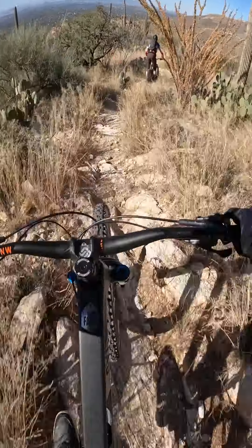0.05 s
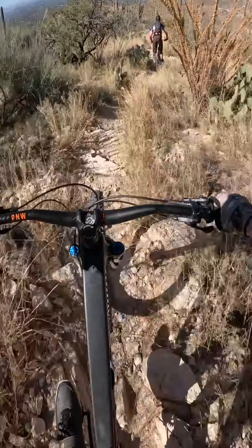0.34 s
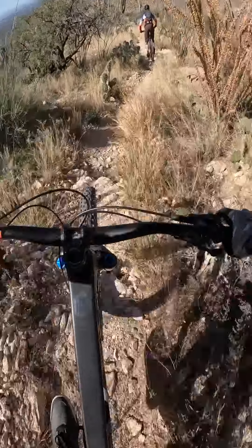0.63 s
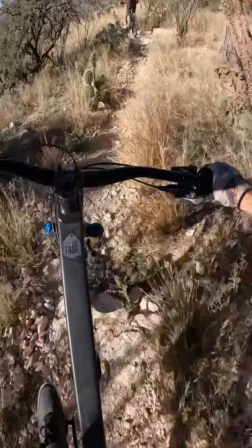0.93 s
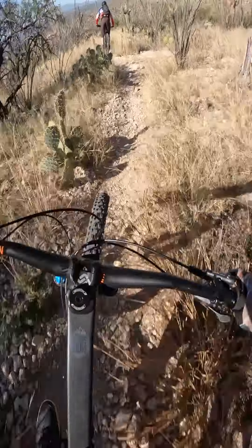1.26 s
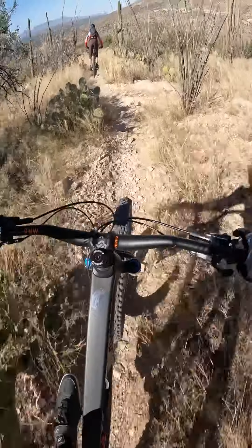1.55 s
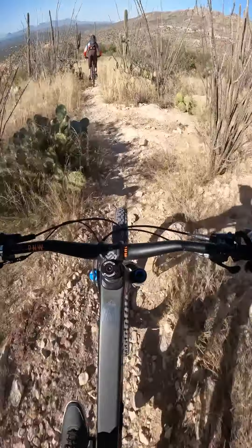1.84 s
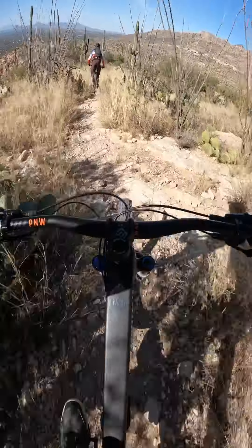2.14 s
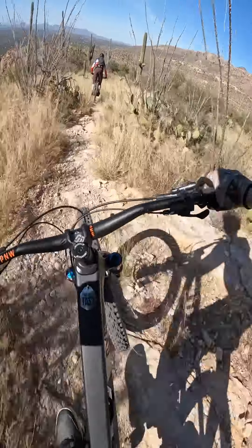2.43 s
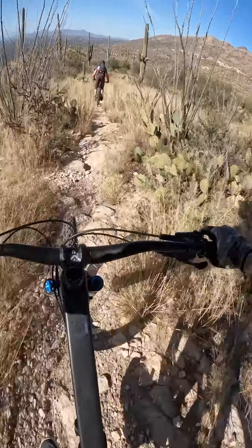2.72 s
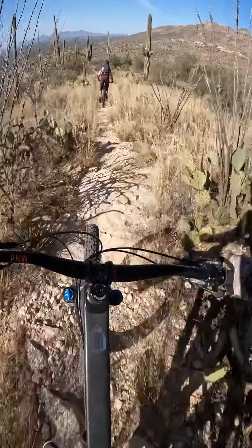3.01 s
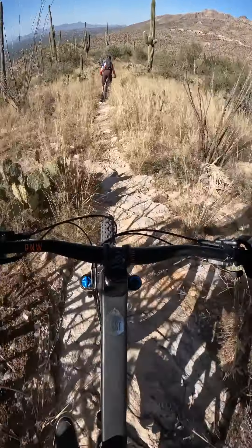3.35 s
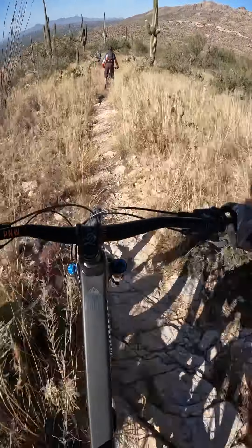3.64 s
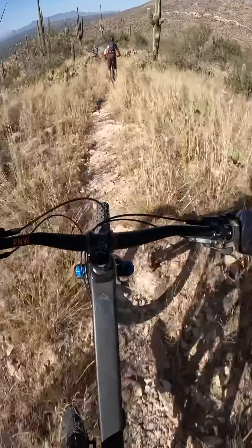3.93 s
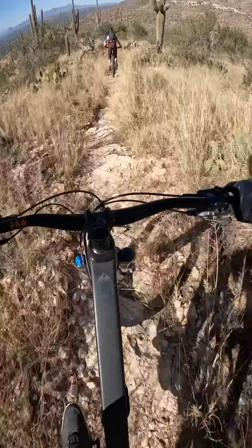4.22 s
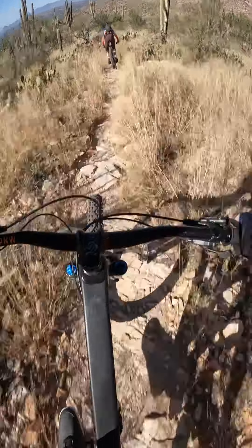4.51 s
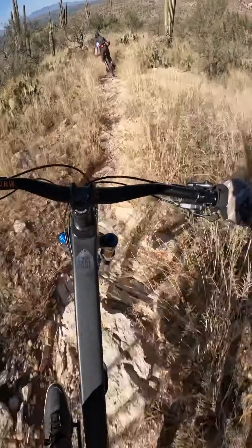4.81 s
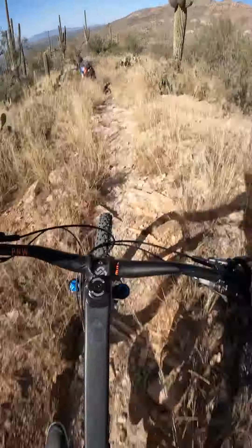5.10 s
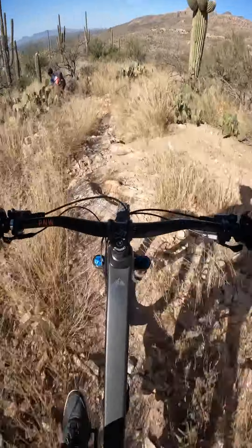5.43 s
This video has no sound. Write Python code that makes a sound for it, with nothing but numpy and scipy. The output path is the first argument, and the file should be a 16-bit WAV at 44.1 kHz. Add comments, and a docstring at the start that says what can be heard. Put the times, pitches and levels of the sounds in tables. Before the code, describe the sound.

A mountain bike coasts down a rocky dirt trail, heard close from the rider's chest. The tyres drum and crunch over gravel while rocks thump the wheels, the frame clacks and cables rattle. Early on it lands off a ledge with a deep thud, and a stone pings off metal. More rough patches follow, with light chain jingle and a whirring hub. Wind buffets the microphone, and there is no echo.

```python
"""A drumming, crunching, clattering ride: a mountain bike coasts down a rocky desert trail.
Tread knobs and stones drum on the hollow tyres, gravel crunches and rocks thump the wheels.
The frame clacks, cables rattle, the chain jingles, the rear hub whirrs and dry grass brushes past.
Wind buffets the microphone on the rider's chest. The open ground gives no echo."""
import sys
import numpy as np
from scipy import signal
from scipy.fft import rfft, irfft
from scipy.io import wavfile
from scipy.ndimage import uniform_filter1d, map_coordinates

SR = 44100
rng = np.random.default_rng(int(sys.argv[2]) if len(sys.argv) > 2 else 0)


def to_wav(sig):
    """Store sig (one row per channel, or 1-D mono) as 16-bit WAV at the path in sys.argv[1].

    Samples outside -1..1 are clipped; the rate is SR.
    """
    pcm = np.clip(np.atleast_2d(sig), -1, 1) * 32767
    pcm = np.round(pcm).astype(np.int16)
    wavfile.write(sys.argv[1], SR, pcm.T)  # frames by channels


N = 249606
TIME = np.arange(N) / SR
HIT_TIME = TIME[:SR // 4]  # the clock for a single hit, in seconds

# A mode is a tone that a struck thing rings with. A fade time (t60) is how long it takes to drop 60 dB.
# modes of the tyre casing and the air inside: (pitch [Hz], level [dB], fade time [s])
TYRE_MODES = [(238, -1.5, 0.22), (276.8, 8, 0.12), (362, -7.5, 0.054), (422, -10.5, 0.13), (552, -5, 0.058),
              (697, -20, 0.046)]
# modes of the frame and handlebar: (pitch [Hz], level [dB], fade time [s])
FRAME_MODES = [(620, -3, 0.049), (1073, -4.5, 0.17), (1310, -3, 0.018), (1558, 6, 0.03),
               (1697, -1.5, 0.053), (2190, -4, 0.027)]
# rocks under the wheels: (time [s], level [dB], pitch [Hz], tyre ring [dB], length [cycles])
ROCK_HITS = [(.036, -15.5, 262, -10, 1.9), (.151, -9.5, 288, -12, 1.1), (.547, -17, 280, -12, 3),
             (0.764, -15.5, 274, -11, 2.4), (.822, -12.5, 276, -6, 3.5), (.930, -12, 378, -21, 0.83),
             (1.024, -19.5, 270, 5, 2.9), (1.128, -22, 290, -6, 2.4), (1.206, -4.5, 233, -13, 0.58),
             (1.28, -16, 214, -15, 2.1), (1.343, -21.5, 280, 11.5, 2.5), (1.348, -15, 432, -4, 3.3),
             (2.014, -9.5, 288, -21, 0.9), (2.127, -9.5, 320, -18, 1.6), (2.295, -13, 342, -18, 1.4),
             (2.328, -8, 480, -13, 1.6), (2.436, -11, 422, -7, 2.8), (2.517, -4, 322, -17, 1.04),
             (2.552, -14.5, 328, -18, 1.1), (2.583, -21.5, 400, 8, 1.5), (2.615, -8, 273, -11, 1.8),
             (2.636, -11, 300, -12, 0.7), (2.651, -21, 443, -21, 0.84), (2.664, -8.5, 408, -27, 0.77),
             (3.335, -21, 258, -2, 0.78), (3.483, -17, 268, -16, 2.1), (3.535, -13, 540, -9, 1.4),
             (3.584, -17, 304, 3, 0.52), (3.659, -23, 450, 3, 1.8), (3.695, -15.5, 269, -13, 1.3),
             (3.813, -14, 430, -10, 0.67), (3.827, -11, 230, -7, 2.1), (4.014, -17, 242, -16, 3.3),
             (4.279, -14.5, 447, -16, 2.6), (4.319, -13.5, 272, -10, 2.6), (4.407, -16, 246, -2, 1.9),
             (4.468, -12.5, 236, -17, 2.4), (4.54, -17.5, 586, 3, 2.6), (4.601, -12.5, 395, -10, 2.4),
             (4.652, -15, 235, -11, 2.1), (4.724, -12.5, 275, -14, 1.3), (4.781, -16.5, 570, -10, 2.8),
             (4.814, -16, 280, -12, 1.5), (4.876, -15, 312, -12, 2), (5.06, -10.5, 258, -14, 1.26),
             (5.212, -11.5, 284, -10, 1.6), (5.300, -14, 243, -14, 1.4), (5.35, -17, 222, -10, 1.3),
             (5.378, -13, 458, -18, 2.3), (5.431, -16.5, 565, -17, 3.1)]
# chain and stones hitting the frame: (time [s], level [dB], pitch [Hz], chatter [dB])
FRAME_HITS = [(.037, -19, 1350, 1.5), (.061, -24, 1970, -6), (.152, -24, 1000, 1.5), (.167, -23, 1200, -3),
              (.245, -15.5, 1080, -18), (.827, -25, 1060, -9), (.931, -19, 1480, -11),
              (1.238, -30, 1560, 0), (1.252, -23, 1650, 5), (1.282, -22.5, 1600, 1), (1.347, -14, 850, -3),
              (1.384, -24, 1200, -4), (1.397, -26, 1070, 9.5), (1.587, -26, 1250, -1),
              (1.948, -20.5, 1180, -15), (2.329, -32, 780, -16), (2.346, -19, 1180, -6),
              (2.405, -22, 1360, -1), (2.438, -18, 1420, -13), (2.594, -14.5, 1520, -10),
              (2.638, -11.5, 1370, -18), (2.651, -19, 1700, -15), (2.664, -15.5, 1130, -11),
              (2.676, -28, 1000, -17), (3.114, -18, 1000, -10), (3.305, -22, 1050, -6),
              (3.413, -14.5, 1040, -21), (3.485, -22.5, 1180, -12), (3.548, -26, 950, -5),
              (3.583, -23, 900, -1), (3.813, -21.5, 870, -4), (3.821, -25, 1290, 0),
              (4.232, -13.5, 1260, -8), (4.258, -17.5, 1400, -5), (4.263, -21, 1380, -13),
              (4.278, -17, 1450, -3), (4.540, -23.5, 1370, 1), (4.571, -23, 1400, 2),
              (4.627, -20, 1450, -3), (4.668, -21, 1160, -6), (4.728, -21.5, 820, -5),
              (5.012, -21.5, 1170, 4), (5.111, -19.5, 1580, -12), (5.204, -29, 1050, 6),
              (5.254, -25, 1460, 5), (5.294, -19, 1340, 2), (5.432, -24, 1190, 4), (5.459, -14.5, 880, -17),
              (5.594, -19, 1300, 0)]


def undb(db):
    """Turn decibels into a gain to multiply by."""
    return 10 ** (np.asarray(db) / 20)


def unit(x):
    """Scale to an average (rms) level of 1."""
    return x / np.sqrt(np.mean(x ** 2))


def peak_one(x):
    """Scale to a peak of 1."""
    return x / np.abs(x).max()


def even(x, span_s):
    """Hold the average level near 1, ironing out swells slower than span_s."""
    return x / np.sqrt(uniform_filter1d(x ** 2, max(int(span_s * SR), 2)) + 1e-9)


def add(track, s, sound):
    """Mix a sound in at s seconds."""
    start = int(np.clip(s * SR, 0, N - 1))
    track[start:start + len(sound)] += sound[:N - start]


def gains(table):
    """Turn rows of (time [s], level [dB], ...) into one gain curve per level column."""
    times, *columns = np.transpose(table)
    return [undb(np.interp(TIME, times, db)) for db in columns]


def bursts(rows, attack_s, release_s):
    """A gain curve that rises, holds and dies away for each (time [s], length [s], level [dB])."""
    power, age = np.zeros(N), TIME[:SR // 2]
    for s, length, db in rows:
        shape = np.minimum(age / attack_s, 1) * np.exp(-np.maximum(age - length, 0) / release_s)
        add(power, s, (undb(db) * shape) ** 2)
    return np.sqrt(power)


def colour(x, points):
    """Shape the lows and highs of a sound to an outline of (frequency [Hz], level [dB])."""
    hz, db = np.transpose(points)
    bins = np.linspace(1, SR / 2, 8193)
    outline = undb(np.interp(np.log(bins), np.log(hz), db))
    cepstrum = irfft(np.log(outline))
    # folding this in half makes the filter ring only after a tap, never before
    half = len(cepstrum) // 2
    cepstrum[1:half] *= 2
    cepstrum[half + 1:] = 0
    response = irfft(np.exp(rfft(cepstrum)))
    return unit(signal.fftconvolve(x, response)[:len(x)])


def band(x, lo_hz, hi_hz, order=2):
    """Keep the part of a sound between two frequencies."""
    sos = signal.butter(order, [lo_hz, min(hi_hz, SR / 2 - 1)], "band", fs=SR, output="sos")
    return signal.sosfilt(sos, x)


def fade(t60):
    """Die away by 60 dB in t60 seconds."""
    return np.exp(-np.log(1000) * HIT_TIME / t60)


def rise(rise_s):
    """Climb softly from 0 towards 1."""
    return 1 - np.exp(-HIT_TIME / rise_s)


def ring(modes):
    """The sound of a thing tapped once: a sum of fading tones."""
    return sum(undb(db) * fade(t60) * np.sin(2 * np.pi * hz * HIT_TIME) for hz, db, t60 in modes)


def resonate(taps, modes):
    """The sound of a thing ringing under a stream of taps."""
    return signal.fftconvolve(taps, ring(modes))[:N]


def swing(hz, cycles):
    """A deadened blow: a few swings that swell and stop."""
    age = HIT_TIME * hz / cycles
    return peak_one(age * np.exp(-age ** 2) * np.sin(2 * np.pi * hz * HIT_TIME))


def walk(rate):
    """A smooth random curve of typical size 1 that turns about rate times a second."""
    step = max(int(SR / rate), 1)
    stairs = np.repeat(rng.standard_normal(N // step + 1), step)
    return unit(uniform_filter1d(stairs, step)[:N])


def waver(x, depth, rate):
    """Let the pitch wander by about the fraction depth."""
    return map_coordinates(x, [np.cumsum(1 + depth * walk(rate))], mode="mirror")


def contacts(per_s, spread_db):
    """Tiny taps at random times; spread_db sets how much their strengths differ."""
    happens = rng.random(N) < per_s / SR
    sizes = np.minimum(rng.exponential(size=N), 4)
    return happens * rng.choice([-1, 1], N) * undb(spread_db * sizes)


def thin_hiss():
    """A faint, high, flickering hiss comes and goes."""
    # strength of the hiss: (time [s], level [dB])
    levels = [(0, -52), (.15, -54), (.22, -60), (.95, -58), (1.15, -52), (1.45, -59.5), (2.3, -53),
              (2.8, -57), (3.55, -52.5), (3.82, -50.5), (4.07, -53), (4.13, -71), (5.2, -61), (5.66, -76)]
    # its tone: (frequency [Hz], level [dB])
    tone = [(6000, -7), (9000, -4), (11400, -8), (12300, -1), (13300, -11), (15500, -20)]
    loudness, = gains(levels)
    flickering = rng.standard_normal(N) * undb(2 * walk(rate=96))
    return loudness * colour(flickering, tone)


def wind(level_db=-1):
    """Swirls of air buffet the microphone with a low rumble."""
    # strength of the gusts: (time [s], level [dB])
    gusts = [(0, -27.5), (.5, -31), (1.1, -26.5), (1.33, -21.5), (1.45, -26), (1.85, -28.5), (2.0, -23.5),
             (2.18, -20), (2.35, -30.5), (2.85, -37), (3.0, -27), (3.7, -21), (3.98, -29.5), (4.08, -14),
             (4.25, -23), (4.6, -19), (4.76, -23), (4.95, -21.5), (5.35, -15.5), (5.66, -20.5)]
    # tone of the rumble: (frequency [Hz], level [dB])
    tone = [(10, -14), (25, 4.5), (42, 0), (60, -3.5), (90, -8), (130, -14), (200, -15.5), (400, -24),
            (1500, -99)]
    gust, = gains(gusts)
    return undb(level_db) * gust * even(colour(rng.standard_normal(N), tone), span_s=0.116)


def grass():
    """Dry stalks flick past in crackling flurries."""
    # grass touching the bike: (time [s], length [s], level [dB])
    brushes = [(1.14, .03, -56), (2.29, .04, -50), (3.08, .07, -51), (3.355, .028, -46.5),
               (3.615, 0.045, -50), (3.73, .16, -47), (4.58, .04, -61)]
    # tone of the stalks: (frequency [Hz], level [dB])
    tone = [(3000, -29), (5500, 5), (7800, 4), (10000, -8), (12400, -2), (15500, -13)]
    flicks = contacts(per_s=6800, spread_db=2) * undb(3 * walk(rate=100))
    return bursts(brushes, attack_s=0.0088, release_s=0.012) * even(colour(flicks, tone), span_s=0.06)


def chain(grit, level_db=-2, shiver_db=-12.5):
    """The slack chain shivers along with the grit and jingles at each jolt."""
    # jolts that fling the chain about: (time [s], length [s], level [dB])
    jolts = [(.13, 0.031, -43), (.56, 0.028, -46), (.78, 0.029, -47.5), (.86, 0.066, -46), (1.14, .03, -46),
             (1.23, 0.13, -48), (1.52, 0.093, -48), (3.36, 0.034, -46), (3.72, 0.17, -54),
             (4.195, 0.031, -47), (4.37, .03, -47), (4.52, .012, -42), (4.705, 0.024, -47),
             (4.93, .015, -46)]
    # modes of the links: (pitch [Hz], level [dB], fade time [s])
    link_modes = [(7010, 4, 0.018), (7310, 7, 0.01), (7500, -1, 0.006)]
    shaking = np.hypot(undb(shiver_db) * grit, bursts(jolts, attack_s=0.0057, release_s=0.017))
    clinks = contacts(per_s=1600, spread_db=3.5) * undb(2 * walk(rate=100))
    return undb(level_db) * shaking * unit(band(resonate(clinks, link_modes), 4100, 11300))


def chain_ticks(top_db=-14):
    """Links slap a cog: many tiny contacts make one short, bright tick."""
    # slaps of the chain: (time [s], level [dB])
    slaps = [(1.110, -27), (1.153, -33), (1.232, -33), (2.637, -27), (2.869, -37), (5.349, -37),
             (5.374, -28.5)]
    out = np.zeros(N)
    for s, db in slaps:
        links = rng.standard_normal(len(HIT_TIME)) * rise(0.0037) * fade(0.021)
        tick = peak_one(band(links, 3600, 8100))
        top = peak_one(band(links, 9400, 12700, order=3))
        add(out, s, undb(db) * (tick + undb(top_db) * top))
    return out


def freehub(loudness, ticks_per_s=820):
    """Small catches tick over a toothed ring in the coasting rear hub and make its shell whirr."""
    # modes of the hub shell: (pitch [Hz], level [dB], fade time [s])
    shell_modes = [(2424, -0.5, 0.019), (2530, -7, 0.0064), (4920, -1.5, 0.0035)]
    tick_rate = ticks_per_s * (1 + 0.045 * walk(rate=15) + 0.1 * walk(rate=700))
    teeth_passed = np.floor(np.cumsum(tick_rate / SR))
    uneven_db = 4 * rng.standard_normal(N) + 3 * walk(rate=34)
    ticks = np.diff(teeth_passed, prepend=0) * undb(uneven_db)
    shell = waver(resonate(ticks, shell_modes), depth=0.02, rate=32)
    return loudness * unit(band(shell, 1820, 6400))


def scrapes():
    """Tread knobs catch and slip on rough rock in a dense rasp."""
    # slides over bare rock: (time [s], length [s], level [dB])
    slides = [(.945, 0.043, -36.5), (2.475, .018, -37), (3.115, 0.017, -35), (3.335, 0.04, -37.5),
              (4.56, 0.095, -32.5), (5.083, .085, -37), (5.173, 0.04, -32), (5.325, 0.049, -40)]
    # tone of the rasp: (frequency [Hz], level [dB])
    tone = [(1200, -21), (1900, 3.5), (2400, 5), (3400, 5.5), (4700, -15), (6000, -10), (11000, -35)]
    slips = contacts(per_s=3700, spread_db=0) * undb(3 * walk(rate=170))
    return bursts(slides, attack_s=0.0051, release_s=0.0087) * even(colour(slips, tone), span_s=0.046)


def rattles():
    """Cables and levers bounce against the handlebar in a rough, woody clatter."""
    # rattling after hard jolts: (time [s], length [s], level [dB])
    jolts = [(1.15, 0.097, -41), (1.348, 0.024, -24), (2.29, 0.033, -41), (2.44, 0.032, -32),
             (2.645, 0.028, -25), (3.39, 0.034, -25), (4.6, .07, -44), (5.25, 0.018, -35),
             (5.295, 0.093, -30), (5.428, 0.0094, -21.5)]
    # modes of the cables and levers: (pitch [Hz], level [dB], fade time [s])
    lever_modes = [(540, 0, 0.034), (657, 6, 0.027), (740, -12, 0.038), (1170, -4, 0.02), (1420, -15, .02)]
    bounces = even(resonate(contacts(per_s=700, spread_db=1), lever_modes), span_s=0.012)
    return bursts(jolts, attack_s=0.0058, release_s=0.0077) * bounces


def snaps(level_db=1, band_ratio=1.14, spray_db=-19):
    """A pebble grates under the tread and springs free with a spray of fine grit."""
    # escaping pebbles: (time [s], level [dB], pitch [Hz])
    escapes = [(.164, -28, 3280), (0.311, -25, 3250), (.6235, -36, 3040), (1.136, -27, 3300),
               (1.3473, -24, 3390), (2.3191, -26.5, 3040), (2.4334, -24, 2860), (2.4775, -30, 3080),
               (2.569, -33, 3700), (2.591, -28, 2800), (2.6372, -24.5, 3200), (2.649, -23, 2800),
               (2.675, -29, 3020), (2.869, -28, 3250), (3.265, -28.5, 3200), (3.434, -26, 3000),
               (3.484, -27, 3140), (3.7027, -24.5, 3160), (3.8492, -27, 3330), (4.301, -26, 3200),
               (4.4777, -27, 3460), (4.582, -25, 3470), (4.6, -21, 3040), (4.655, -24, 3300),
               (5.136, -25, 3900), (5.189, -31, 3000)]
    out = np.zeros(N)
    for s, db, hz in escapes:
        grating = rng.choice([-1., 1.], len(HIT_TIME)) * rise(0.0013)
        pebble = peak_one(band(grating * fade(0.04), hz / band_ratio, hz * band_ratio))
        spray = peak_one(band(grating * fade(0.027), 5200, 8400))
        add(out, s, undb(db + level_db) * (pebble + undb(spray_db) * spray))
    return out


def ping(scrape_db=-9, spit_db=-19, db_per_octave=13):
    """A flung stone grazes metal, strikes it twice and skips off."""
    # each touch rings the modes near its own pitch most: (time [s], level [dB], pitch [Hz])
    touches = [(1.392, -30, 8600), (1.4015, -25, 8600), (1.4045, -13.5, 6900), (1.4065, -12, 4500),
               (1.414, -30, 3500)]
    # modes of the metal part: (pitch [Hz], level [dB], fade time [s])
    metal_modes = [(3090, -9, 0.041), (3720, -7, 0.048), (4080, -7, .03), (4500, -3, 0.014),
                   (4640, 2, 0.016), (5766, -13, 0.062), (6740, -18, .035), (6900, 4, 0.012),
                   (7840, -8.5, 0.035), (8900, -19, .03), (9660, -23, .04)]
    out, press = np.zeros(N), rise(0.00057)
    for s, db, touch_hz in touches:
        modes = [(hz, mode_db - db_per_octave * abs(np.log2(hz / touch_hz)), t60)
                 for hz, mode_db, t60 in metal_modes]
        grazing = rng.standard_normal(len(HIT_TIME)) * press
        scrape = undb(scrape_db) * peak_one(band(grazing * fade(0.04), 1700, 4900))
        spit = undb(spit_db) * peak_one(band(grazing * fade(0.025), 4500, 8600))
        add(out, s, undb(db) * (peak_one(press * ring(modes)) + scrape + spit))
    return out


def shudders():
    """Blows come too fast for the front suspension to recover and merge into a heavy rumble."""
    # runs of rocks: (time [s], length [s], level [dB])
    rock_runs = [(.155, 0.064, -32), (1.205, 0.023, -23.5), (2.615, 0.013, -27), (3.35, 0.034, -27),
                 (3.68, 0.025, -22.5), (5.06, 0.18, -24), (5.26, 0.081, -19.5), (5.37, 0.18, -26)]
    # modes of the bending fork and frame: (pitch [Hz], level [dB], fade time [s])
    fork_modes = [(109, 2, 0.15), (138, 3, 0.076), (181, -0.5, 0.065)]
    flexing = even(resonate(contacts(per_s=480, spread_db=-2), fork_modes), span_s=0.052)
    return bursts(rock_runs, attack_s=0.0027, release_s=0.0097) * flexing


def landing(at_s=1.343):
    """Bike and rider drop off a ledge and land with their whole weight in one deep thud."""
    thud, weight = (145, -7, 0.083), (64, -17, 0.26)  # (pitch [Hz], level [dB], fade time [s])
    out = np.zeros(N)
    add(out, at_s, -ring([thud, weight]))
    return out


def clacks(level_db=1, cycles=2.22, ring_db=-11, flex_db=-4, flex_hz=620):
    """A hard knock flexes the frame, rings it briefly and sets loose parts chattering."""
    out = np.zeros(N)
    frame = undb(ring_db) * peak_one(ring(FRAME_MODES)) + undb(flex_db) * swing(flex_hz, cycles)
    settling = rise(0.0028) * fade(0.044)
    for s, db, hz, chatter_db in FRAME_HITS:
        loose_parts = rng.choice([-1., 1.], len(HIT_TIME)) * settling
        chatter = peak_one(band(loose_parts, 960, 2120, order=3))
        add(out, s, undb(db + level_db) * (swing(hz, cycles) + frame + undb(chatter_db) * chatter))
    return out


def thumps(slap_db=-13, thud_db=-18, thud_hz=145, thud_t60=0.07):
    """A rock dents the tyre: the casing swings, rubber slaps and the air inside rings over a thud."""
    out = np.zeros(N)
    tyre_ring = peak_one(ring(TYRE_MODES))
    thud = ring([(thud_hz, thud_db, thud_t60)])
    for s, db, hz, ring_db, cycles in ROCK_HITS:
        slap = peak_one(band(rng.standard_normal(len(HIT_TIME)), 360, 1050) * fade(0.054))
        body = swing(hz, cycles) + undb(ring_db) * tyre_ring + thud
        add(out, s, -undb(db) * (body + undb(slap_db) * slap))
    return out


def pebbles(per_s=550, spread_db=2.3, cycles=4, lowest_hz=750):
    """Loose pebbles click together; small ones are higher and a little weaker."""
    out, t = np.zeros(N), TIME[:SR // 40]
    for when, smallness, softness, length in rng.random((int(per_s * N / SR), 4)):
        hz = lowest_hz * 6 ** smallness
        age = t * hz / (cycles * (0.5 + length))
        strength = undb(-spread_db * np.log(0.03 + softness)) * (lowest_hz / hz) ** 0.074
        click = age * np.exp(-age ** 2) * np.sin(2 * np.pi * hz * t)
        add(out, when * N / SR, strength * click)
    return even(out, span_s=0.235)


def gravel(crunch, grit, stones_db=-2, frame_db=-9, pebbles_db=-4, sand_db=1.5):
    """Stones grind in clumps under the tread and shake the frame; sand crackles along."""
    # tone of the stones: (frequency [Hz], level [dB])
    stone_tone = [(300, -13), (650, -37), (950, -0.5), (1250, 5.5), (1600, 4), (2100, -4), (2800, -17.5),
                  (4000, -14.5), (9000, -75)]
    # tone of the sand: (frequency [Hz], level [dB])
    sand_tone = [(1000, -26), (2200, 3), (3100, 0), (4200, -4.5), (5200, -7.5), (6200, -12), (8200, -15),
                 (9500, -24.5), (11500, -26), (13000, -52), (15500, -51)]
    clumps = walk(rate=90)
    grinding = contacts(per_s=4000, spread_db=1) * undb(2.5 * clumps)
    stones = even(colour(grinding, stone_tone), span_s=0.14)
    frame = even(resonate(contacts(per_s=300, spread_db=1), FRAME_MODES), span_s=0.23)
    grains = contacts(per_s=12000, spread_db=2) * undb(1.82 * clumps)
    sand = even(colour(grains, sand_tone), span_s=0.11)
    coarse = undb(stones_db) * stones + undb(frame_db) * frame + undb(pebbles_db) * pebbles()
    return crunch * coarse + undb(sand_db) * grit * sand


def tyres(drumming, hum, casing_db=-3, air_db=-1):
    """Knobs and small stones patter on the rubber casing and keep the air inside humming."""
    # tone of the patter: (frequency [Hz], level [dB])
    tread_tone = [(50, -26), (110, -19), (190, -0.5), (300, 2.5), (420, 4.5), (580, 0.5), (750, -6),
                  (1000, -27.5), (2000, -17.5), (5000, -70)]
    patter = contacts(per_s=900, spread_db=2) * undb(2 * walk(rate=54))
    casing = even(colour(patter, tread_tone), span_s=0.1)
    air = even(resonate(contacts(per_s=500, spread_db=3), TYRE_MODES), span_s=0.045)
    return undb(casing_db) * drumming * casing + undb(air_db) * hum * air


def grip(dip_db=-4, lead_s=0.0173, gap_s=0.0072):
    """A gain that dips just before each thump or clack, as the tyre skips over a gap."""
    skips = np.zeros(N)
    for s, *_ in ROCK_HITS + FRAME_HITS:
        add(skips, s - lead_s, np.ones(1))
    airborne = signal.fftconvolve(skips, np.hanning(int(gap_s * SR) + 3), "same")
    return undb(dip_db * np.minimum(airborne, 1))


def wheels(drumming, grit, whirr, hum_db=-5.5, loose_db=-10.5, spray_db=-11, judder_db=-27):
    """The wheels roll on; each stony patch loads the tyres, crunches, sprays grit and shakes the hub."""
    # patches of stones: (time [s], length [s], crunch [dB], drumming [dB])
    patches = [(0.044, 0.042, -43, -40), (0.16, 0.081, -35, -23.5), (0.4, 0.025, -32.5, -24.5),
               (0.444, 0.042, -31.5, -35), (0.623, 0.024, -31.5, -27), (0.692, 0.044, -30, -28.5),
               (0.864, .025, -36.5, -32), (0.927, 0.084, -31, -22), (1.123, 0.1, -34, -24),
               (1.211, 0.047, -27.5, -23), (1.308, 0.19, -34, -39), (1.664, 0.014, -35, -43),
               (1.925, 0.037, -33.5, -23), (2.058, 0.022, -40, -21), (2.227, 0.058, -37, -23),
               (2.313, 0.026, -46, -24), (2.423, 0.07, -33, -29), (2.615, 0.043, -31, -22),
               (2.702, 0.042, -35.5, -31), (2.819, .01, -37, -27), (2.873, 0.018, -36.5, -30),
               (2.921, 0.024, -35, -25.5), (3.013, 0.055, -36.5, -28), (3.088, 0.038, -32.5, -29),
               (3.19, 0.036, -36, -24.5), (3.293, 0.098, -33, -23), (3.47, 0.017, -32.5, -19),
               (3.527, 0.022, -33, -22), (3.619, 0.048, -31.5, -20.5), (3.807, 0.058, -32.5, -23),
               (3.894, 0.059, -37, -29.5), (4.01, 0.033, -34.5, -25), (4.08, 0.091, -34, -21.5),
               (4.309, 0.012, -29, -36), (4.408, 0.056, -30, -23), (4.554, 0.091, -29.5, -23),
               (4.78, 0.1, -34.5, -22), (5.085, 0.036, -32, -23.5), (5.173, 0.033, -29.5, -25),
               (5.286, 0.09, -30, -23), (5.388, 0.078, -45, -34), (5.5, 0.031, -33.5, -26),
               (5.589, 0.061, -32, -35)]
    # air humming inside the rolling tyres: (time [s], level [dB])
    hum_levels = [(0, -28.5), (.45, -27.5), (.62, -40), (.72, -34), (.9, -27.5), (1.1, -33), (1.3, -21),
                  (1.5, -27), (1.8, -34), (1.89, -28.5), (1.97, -31), (2.2, -27.5), (2.55, -28),
                  (2.68, -29), (2.78, -41), (2.95, -27.5), (3.32, -27.5), (3.6, -25.5), (3.72, -28.5),
                  (4.0, -27.5), (4.2, -24), (4.5, -27), (4.77, -19), (4.88, -27.5), (4.98, -32),
                  (5.15, -29), (5.3, -24.5), (5.66, -27)]
    crunch = bursts(np.array(patches)[:, [0, 1, 2]], attack_s=0.0035, release_s=0.02)
    load = bursts(np.array(patches)[:, [0, 1, 3]], attack_s=0.0076, release_s=0.018)
    hum, = gains(hum_levels)
    # hypot adds two levels the way unrelated noises add up
    rubber = tyres(np.hypot(drumming, load), np.hypot(hum, undb(hum_db) * load))
    stone_gain = np.hypot(undb(loose_db) * drumming, crunch)
    sand_gain = np.hypot(grit, undb(spray_db) * crunch)
    hub = freehub(np.hypot(whirr, undb(judder_db) * crunch))
    return grip() * (rubber + gravel(stone_gain, sand_gain)) + hub


def scene():
    """Mix the rolling, the knocks, the wind and the hiss into one close, echo-free channel."""
    # the ride between rough spots: (time [s], tyre drumming [dB], fine grit [dB], hub whirr [dB])
    ride = [(0, -25.5, -40.5, -42), (.35, -28, -41, -45.5), (.6, -31.5, -41, -42),
            (.85, -27.5, -43.5, -37.5), (1.1, -29, -40, -36.5), (1.3, -24.5, -39, -38),
            (1.55, -24.5, -42.5, -43.5), (1.82, -29, -43, -46), (2.1, -26, -43, -44),
            (2.55, -26.5, -44, -43), (2.68, -31.5, -45.5, -49), (2.8, -31, -47.5, -51),
            (3.0, -30, -45.5, -42), (3.12, -27, -41.5, -41), (3.22, -31.5, -42.5, -50),
            (3.5, -26, -40, -45), (3.77, -30.5, -40, -41.5), (4.1, -26.5, -39.5, -45.5),
            (4.21, -28, -38.5, -35), (4.28, -25, -39.5, -48), (4.42, -25.5, -37, -36),
            (4.52, -29.5, -41, -35.5), (4.65, -26.5, -38.5, -39), (4.75, -24.5, -36.5, -45),
            (4.86, -28, -37, -43), (4.98, -31, -40, -52), (5.15, -24, -37, -43.5),
            (5.66, -27, -45.5, -38.5)]
    drumming, grit, whirr = gains(ride)
    rolling = wheels(drumming, grit, whirr) + chain(grit) + scrapes() + grass()
    knocks = thumps() + shudders() + landing() + clacks() + rattles() + snaps() + chain_ticks() + ping()
    return (rolling + knocks + wind() + thin_hiss())[None]


def record(dry, ceiling=0.66, top_hz=15600):
    """The chest camera rounds off the loudest peaks and cuts the highest treble."""
    rounded = ceiling * np.tanh(dry / ceiling)
    low_pass = signal.ellip(10, 0.2, 80, top_hz, fs=SR, output="sos")
    return signal.sosfilt(low_pass, rounded)


dry = scene()
out = record(dry)
to_wav(out)
```